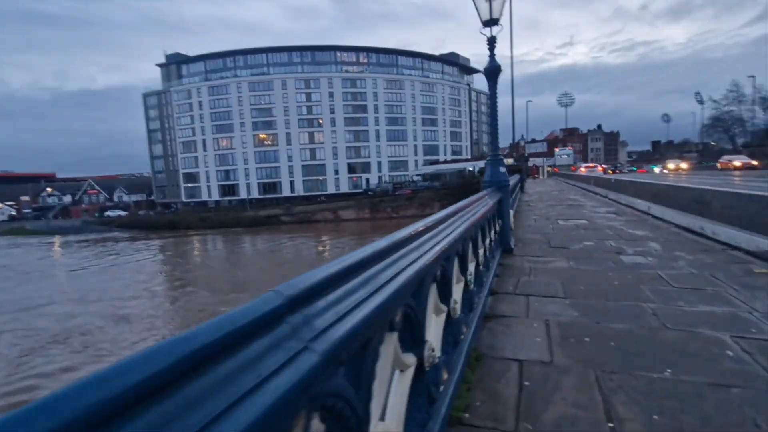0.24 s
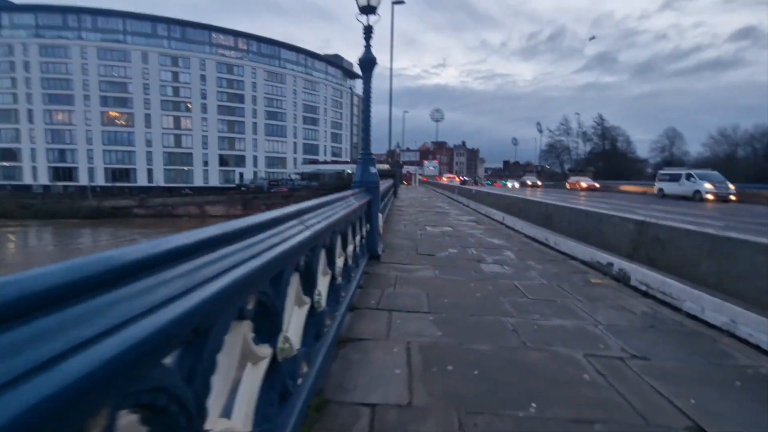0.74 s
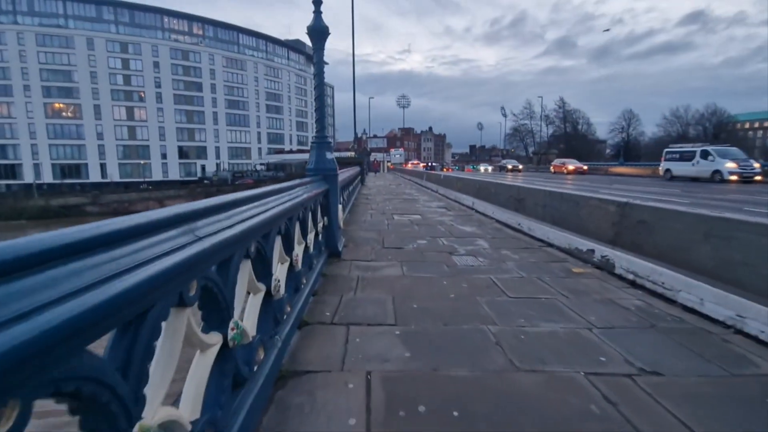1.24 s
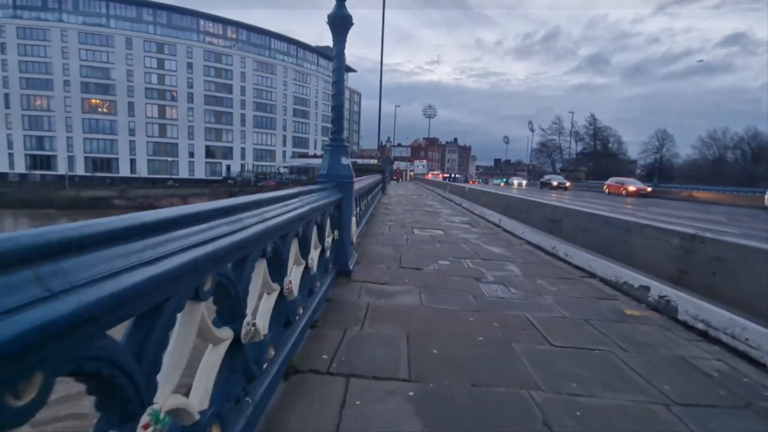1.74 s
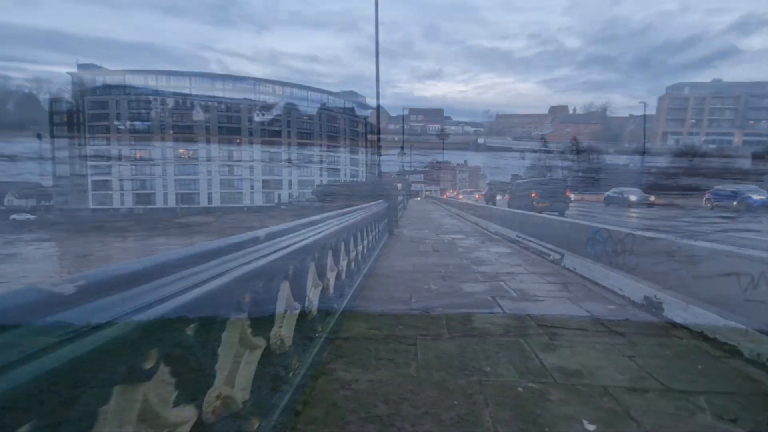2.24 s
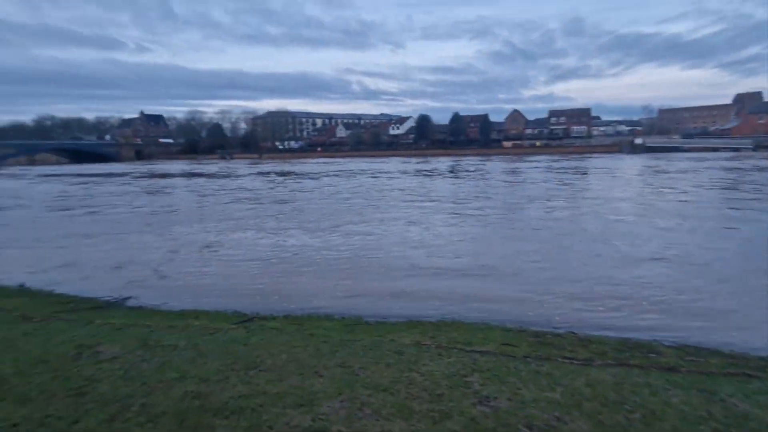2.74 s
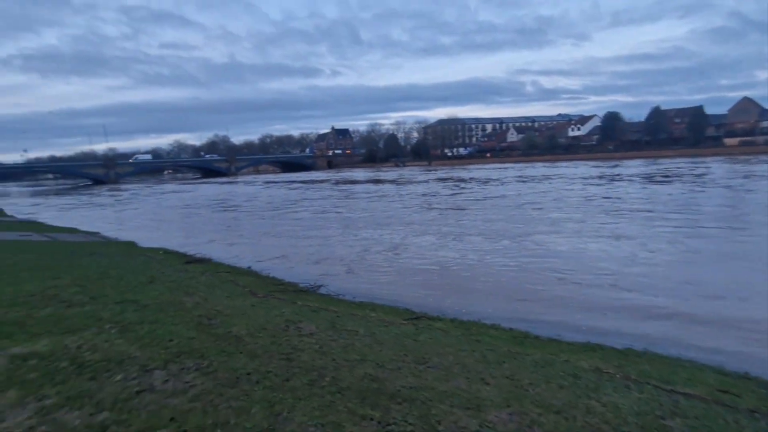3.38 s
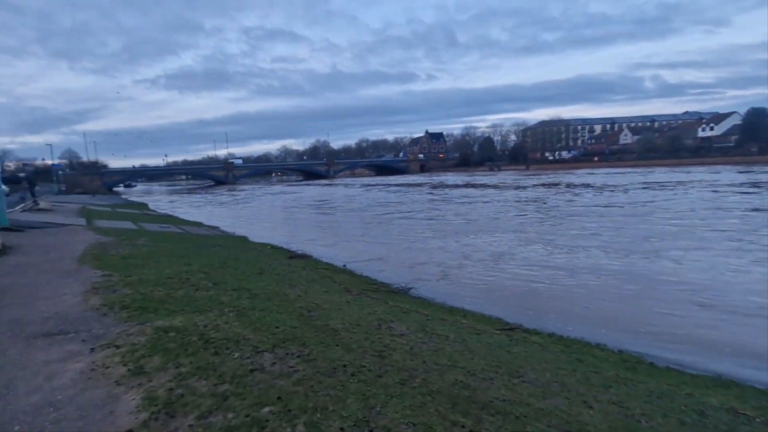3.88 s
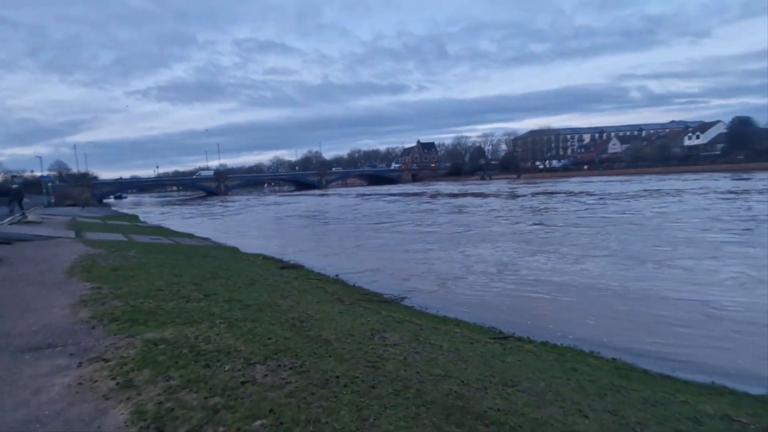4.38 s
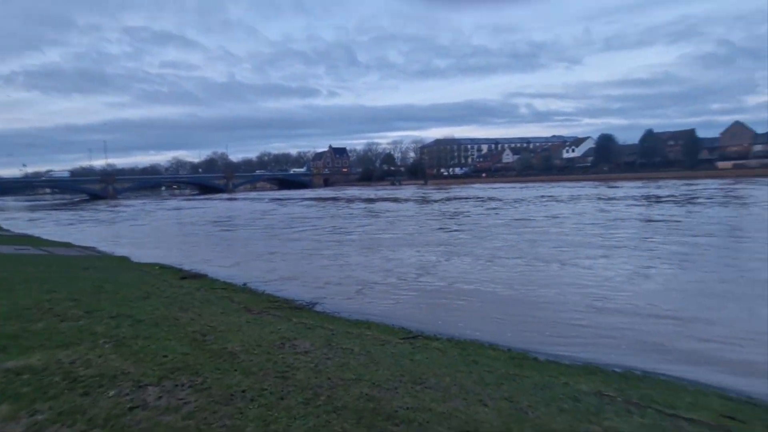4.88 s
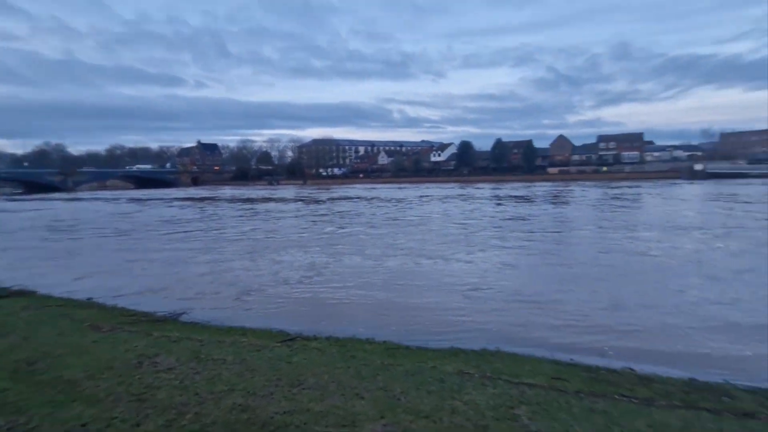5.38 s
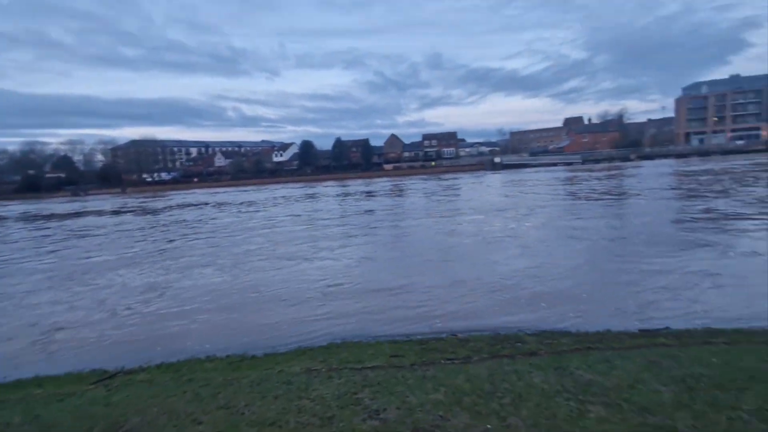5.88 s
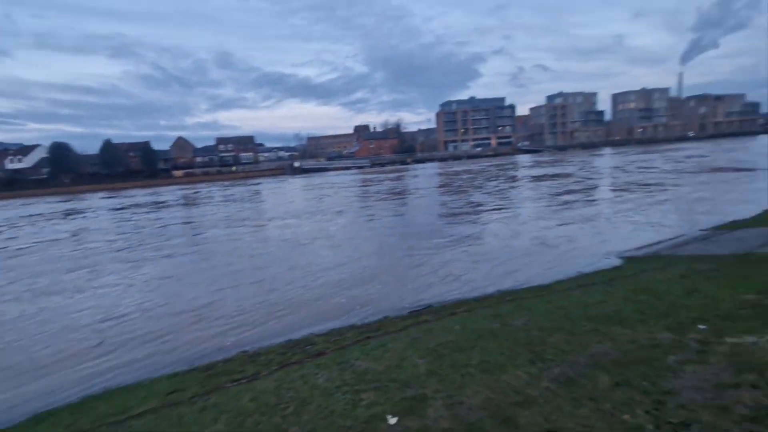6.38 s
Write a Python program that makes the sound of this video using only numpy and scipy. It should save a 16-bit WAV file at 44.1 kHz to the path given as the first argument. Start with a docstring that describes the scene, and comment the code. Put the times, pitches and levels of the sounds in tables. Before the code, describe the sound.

Loud tyre roar and throbbing engines stop dead; after a brief silence, soft river wash and distant rumble continue with gusts and faint bumps.

```python
"""Traffic on a wet bridge, heard from the footway: tyres roar, spray hisses and exhausts beat together.
Tyres, spray, rumble, river and wind are shaped stereo noise; the exhausts are sines at drifting firing rates.
After a brief silence comes a river bank: the town rumbles far off and the water washes by.
Close up, gusts mostly catch the right microphone port and a sleeve swishes in grainy strokes;
taps are sharp pushes on the camera, ticks ringing noise bursts and soft low thumps dying sines."""
import sys
import numpy as np
from scipy import signal
from scipy.fft import rfft, irfft, next_fast_len
from scipy.io import wavfile
from scipy.ndimage import uniform_filter1d, map_coordinates

SR = 44100
rng = np.random.default_rng(int(sys.argv[2]) if len(sys.argv) > 2 else 0)


def log_audio(samples):
    """Write samples as a 16-bit WAV file to the path given in sys.argv[1]."""
    # one column per channel
    frames = np.atleast_2d(samples).T
    # limit to full scale, then quantise
    limited = np.clip(frames, -1, 1)
    pcm = np.round(limited * 32767).astype(np.int16)
    wavfile.write(sys.argv[1], SR, pcm)


N = 291930

LEAVE_BRIDGE_S, REACH_BANK_S = 2.226, 2.349
TOP_HZ = 15850  # band limit of the camera

# lean_db is left level minus right level; relative_db sets only the shape of a spectrum.
# tyre roar of the near lanes, shifting left as a van goes by, before lift and tint:
# start_s, level_db, lean_db
TYRE_PASSES = [(0, -34, 0), (.45, -35, -0.5), (.8, -33.5, -0.5), (1.03, -32.5, 1.5), (1.22, -34, 1),
               (1.38, -33.5, 0.5), (1.72, -36, 4), (2.22, -34, 3)]
ROAR_LIFT_DB = 4.5
# colour of the treads: pitch_hz, relative_db
TYRE_SPECTRUM = [(180, -25), (300, -5), (377, -8.5), (620, -5), (885, -7), (1300, -5.5), (1730, -10),
                 (2230, -12), (2650, -20.5), (3140, -21), (5000, -30.5), (7300, -39.5), (9000, -69),
                 (15500, -73)]
# left-right likeness of the road noise: pitch_hz, coherence
ROAD_ALIKE = [(200, .97), (320, .9), (480, .76), (620, .7), (800, .54), (1200, .44), (1650, .48),
              (2100, .15), (3000, .05), (15000, 0)]
# the lanes lie to the right: the left port hears the roar this much later
ROAD_LAG_S = .00029
# the roar changes colour as the camera turns: time_s, share of the tint
BRIDGE_TURN = [(.6, -1), (1.4, 0.5)]
# the full tint of the roar: pitch_hz, gain_db
BRIDGE_TINT = [(250, 0.5), (380, -3), (540, 2.5), (750, -0.3), (1000, 0), (1500, 0.8), (2100, 1.5),
               (2800, -0.5), (4000, 1.5), (6000, -7), (8000, -3), (10000, 9), (12000, 2.5)]

# single cars throw up spray, before lift: centre_s, length_s, level_db, lean_db
SPRAY_BURSTS = [(.08, 0.14, -42.5, 5.5), (.2, 0.24, -51.5, 7.5), (.79, 0.053, -56, 9),
                (1.38, .2, -69.5, 11), (1.76, 0.68, -55.5, 1)]
# the steady spray of the whole road, before lift
MIST_DB, MIST_LEAN_DB = -64.5, 12.5
SPRAY_LIFT_DB = 3.5
# hiss of the spray: pitch_hz, relative_db
SPRAY_SPECTRUM = [(1500, -1), (3500, -2), (5500, -0.5), (7200, -3.5), (8800, -14.5), (10300, -13),
                  (11800, -6), (15500, -10.5)]

RUMBLE_DB = -30.5  # car bodies, around which the rumble wavers
# wheels thud over the uneven deck: centre_s, length_s, level_db, lean_db
DECK_THUDS = [(.79, 0.069, -34, 5.5), (1.025, 0.091, -23, -0.5), (1.22, 0.074, -27.5, 1),
              (1.385, 0.033, -30, 3), (1.415, 0.025, -26.5, 5), (1.72, 0.087, -36, 4),
              (2.07, 0.28, -29, 0.5)]
# rumble of the car bodies: pitch_hz, relative_db
RUMBLE_SPECTRUM = [(20, -25), (33, -1), (46, -2), (62, 0.5), (88, 7), (125, 4.5), (170, 1.5), (230, 1.5),
                   (300, -4), (400, -15.5), (700, -73)]

# firing rate of the nearest engine, before drift: time_s, pitch_hz
FIRING_RATE = [(0, 56), (.45, 55), (.7, 60), (1.15, 60), (1.65, 57), (2.22, 55)]
# a second engine fires this much slower: time_s, beat_hz
BEAT_RATE = [(.4, 6.7), (1.15, 7.0), (1.45, 6.2), (2.2, 5.9)]
IN_STEP_S = 1.382  # a moment at which these two boom together
# levels of two slower engines against the nearest; the third's speed over the nearest's
SECOND_DB, THIRD_DB, THIRD_RATIO = -8.5, -15, 0.79
# joint level of the exhausts, surging as they near: time_s, level_db
EXHAUST_SURGES = [(0, -32.5), (.42, -32.5), (.51, -26), (.66, -34), (.78, -24.5), (.9, -28), (1.22, -24.5),
                  (1.32, -27), (1.42, -23.5), (1.7, -22), (2.22, -22)]

# gusts on the ports: centre_s, length_s, level_db, lean_db
GUSTS = [(1.03, 0.12, -31, 4.5), (1.39, 0.033, -27, -7.5), (2.85, 0.014, -30.5, -15),
         (2.91, 0.1, -33.5, -13.5), (2.998, 0.028, -23, -23), (3.025, 0.047, -22.5, -30),
         (3.066, 0.03, -26, -14), (3.1, .05, -30.5, -13), (3.14, 0.052, -25.5, -12.5),
         (3.2, 0.035, -24.5, -20), (3.24, 0.042, -26.5, -20), (3.275, 0.048, -25.5, -12),
         (3.32, .04, -35, -14), (3.358, 0.037, -27.5, -22), (4.775, 0.014, -39, 2)]
# buffeting of a gust: pitch_hz, relative_db
BUFFET_SPECTRUM = [(20, -24), (50, -3), (95, 3), (150, 1), (220, -4), (310, -3.5), (430, -10.5), (750, -13),
                   (1400, -21.5), (2100, -25.5), (2700, -29), (4200, -39.5), (7000, -57.5), (9500, -64),
                   (15000, -68.5)]
# left-right likeness of the buffeting: pitch_hz, coherence
BUFFET_ALIKE = [(110, 0.89), (230, 0.23), (600, 0.12)]
# some gusts carry a rasp, as does a faint puff at 4.775 s: centre_s, length_s, level_db, lean_db
RASPS = [(2.992, .016, -37.5, -21), (3.015, 0.047, -34, -23), (3.063, 0.024, -35.5, -18),
         (3.145, 0.048, -38, -20), (3.205, 0.044, -33.5, -23.5), (3.268, 0.043, -32, -25),
         (3.361, 0.022, -35.5, -23), (4.775, 0.036, -40.5, 5)]
# colour of the rasp: pitch_hz, relative_db
RASP_SPECTRUM = [(400, -13), (1000, 3.5), (1500, 6), (2200, 0), (2800, -11.5), (3900, -16), (5000, -33),
                 (7000, -36), (10000, -44.5)]

# sleeve swishes, with one very short burst of hiss in the click at 1.42 s:
# centre_s, length_s, level_db, lean_db
SWISHES = [(1.29, .035, -38.5, -2.5), (1.36, 0.017, -39.5, -11), (1.424, 0.0045, -37.5, -12.5),
           (2.51, 0.09, -61.5, -6), (2.595, 0.032, -50.5, -14), (2.76, 0.3, -50.5, -20),
           (2.89, 0.041, -46.5, -20), (3.0, 0.17, -50.5, -16.5), (3.25, 0.29, -54.5, -24),
           (3.63, 0.15, -63, -15.5), (4.768, 0.071, -55.5, -10), (5.13, 0.053, -54.5, -16),
           (5.21, 0.056, -55, -12), (5.424, 0.036, -51.5, -14), (5.535, 0.031, -53.5, -6),
           (6.19, 0.16, -59, 14), (6.305, 0.13, -56, 14.5), (6.46, .04, -59, 24), (6.57, 0.12, -62, 29)]
# colour of the swishes: pitch_hz, relative_db
CLOTH_SPECTRUM = [(900, -13.5), (2000, 4.5), (3300, 2), (5500, -5), (7000, -12), (9000, -30.5),
                  (12000, -22.5), (15500, -20)]
# unevenness of the fabric: fine grain, slower catching
FIBRE_GRAIN_DB, FIBRE_CATCH_DB = 1.8, 1.2

# dry taps on the camera body, before colouring: start_s, level_db, lean_db, contact_s
TAPS = [(1.144, -18, -8, .0001), (1.255, -19.5, -5, 0.00023), (1.3492, -20.5, -10, 0.00021),
        (1.362, -19, -8.5, 0.0002), (1.4113, -18.5, -9, 0.00029), (1.4155, -12.5, -17, 0.00012),
        (1.421, -14, -17, .00017), (1.4233, -13.5, -14, .00014), (1.424, -11, -17.5, 0.00005),
        (1.4287, -17.5, -11, 0.00012), (2.941, -25.5, -14, .0005), (2.988, -18, -18.5, 0.00071),
        (3.351, -22.5, -18, .0006), (4.956, -28, -12, 0.00037), (5.742, -29, 5, 0.00036),
        (5.746, -38.5, 6, .00022)]
# colour of the taps: pitch_hz, gain_db
TAP_COLOUR = [(1500, -1), (4000, -4), (7000, -4), (9000, -20.5), (15500, -5.5)]
# against the tap: scratch after each contact, then the case's dull answer
GRIT_DB, GRIT_T60_S = -17, 0.009
KNOCK_HZ, KNOCK_T60_S, KNOCK_DB = 190, 0.017, -11.5

# thin high ticks: start_s, level_db, pitch_hz (centre), lean_db
TICKS = [(2.894, -46.5, 12540, 4), (4.252, -62, 6950, -6), (4.43, -66, 7400, -6), (4.76, -63, 8700, 6)]
TICK_HALF_WIDTH_HZ, TICK_T60_S = 830, 0.054  # shared by all ticks

# soft low thumps, those near 3 s being the body of the gust, before lift:
# start_s, level_db, pitch_hz, t60_s
THUMPS = [(2.988, -22, 215, .07), (3.019, -16.5, 114, 0.085), (3.022, -18.5, 238, .06),
          (3.939, -26.5, 147, 0.12), (4.108, -27.5, 60.2, 0.37), (4.949, -21.5, 60.7, 0.12),
          (5.601, -24, 54.6, 0.19), (5.738, -19.5, 154.5, 0.062), (5.741, -23, 255, 0.051),
          (5.818, -26.5, 64.6, 0.49)]
THUMP_LIFT_DB = 0.5

# wash of the river, before wavering, tint and fade: time_s, level_db
WASH_LEVEL = [(2.36, -38), (2.5, -39.5), (2.75, -40.5), (3.6, -41.5), (4.5, -42), (4.9, -41), (5.45, -42),
              (5.7, -43.5), (6.62, -44.5)]
# colour of the wash: pitch_hz, relative_db
RIVER_SPECTRUM = [(210, -16), (340, -3.5), (470, -3), (720, -0.8), (980, -.5), (1200, -1.5), (1450, -3),
                  (1800, -6), (2150, -8.5), (2650, -18.5), (3300, -22.5), (3900, -26.5), (5100, -34.5),
                  (7200, -42.5), (9300, -57.5), (15500, -62)]
# the wash changes colour as the camera turns: time_s, share of the tint
BANK_TURN = [(4.9, 0), (5.7, 0.96)]
# the full tint of the wash: pitch_hz, gain_db
BANK_TINT = [(200, 5), (330, 4.5), (480, 4.5), (720, -2), (1100, -1), (1800, 0), (3000, 0.5), (4500, 0.5),
             (6000, 1), (8000, -15), (15000, 2)]
# far rumble at the start of the bank, before its swell-in; its slow ebb
TOWN_DB, TOWN_FALL_DB_PER_S = -34.5, 0.41
# rumble of the town: pitch_hz, relative_db
TOWN_SPECTRUM = [(15, -36), (25, -18), (35, -4), (46, 2), (57, 5), (80, -1), (131, -3), (188, -7),
                 (275, -7.5), (345, -14.5), (450, -23), (700, -76)]
BANK_FADE_DB, BANK_FADE_S = 8.5, 0.085  # the bank swells in by this much, over this time
# left-right likeness of sound from all around: pitch_hz, coherence
ALIKE = [(60, 0.98), (130, 0.97), (290, 0.82), (450, 0.5), (620, 0.46), (900, -0.13), (1350, -0.36),
         (1800, 0.091), (3200, 0.053), (15000, -0.084)]


def amp(db):
    """Decibels to gain."""
    return 10 ** (np.asarray(db) / 20)


def unit(x):
    """Scale to rms 1."""
    return x / np.sqrt(np.mean(x ** 2) + 1e-20)


def clock():
    """The time of every sample, in seconds."""
    return np.arange(N) / SR


def along(points, hz):
    """Read (pitch_hz, value) points on a log frequency axis."""
    f, v = np.transpose(points)
    return np.interp(np.log(hz + 1), np.log(f + 1), v)


def curves(rows):
    """One value per sample for each column after the time."""
    s, *cols = np.transpose(rows)
    return [np.interp(clock(), s, c) for c in cols]


def wobble(rate):
    """A smooth random curve with rate knots a second."""
    knots = rng.standard_normal(int(N * rate / SR) + 4)
    return map_coordinates(knots, [np.arange(N) * rate / SR])


def filtered(x, response):
    """Shape x with a response given as a function of frequency."""
    m = next_fast_len(N + 8192)
    return irfft(rfft(x, m) * response(np.fft.rfftfreq(m, 1 / SR)), m)[..., :N]


def pan(lean_db):
    """Left and right gains of constant power."""
    gains = amp(np.array([[.5], [-.5]]) * lean_db)
    return gains / np.sqrt(np.mean(gains ** 2, axis=0))


def rush(spectrum, alike, patchy_db=0):
    """Stereo noise of rms 1, smooth or with patches of random gain, its width set by the coherence."""
    z = signal.stft(rng.standard_normal((2, N)), nperseg=512)[2]
    field = rng.standard_normal(z.shape[1:])
    field = uniform_filter1d(field, size=5, axis=0)  # across frequency
    field = uniform_filter1d(field, size=14, axis=1)  # across time
    pair = signal.istft(z * amp(patchy_db * unit(field)), nperseg=512)[1][:, :N]

    def mid_side(hz):
        angle = np.arccos(np.clip(along(alike, hz), -1, 1)) / 2
        return amp(along(spectrum, hz)) * [np.cos(angle), np.sin(angle)]

    mid, side = filtered(pair, mid_side)
    return unit(np.array([mid + side, mid - side]))


def swells(rows):
    """Stereo envelope of bell-shaped swells whose powers sum."""
    t = clock()
    power = 0
    for s, length, db, lean_db in rows:
        bell = np.exp(-np.minimum((2 * (t - s) / length) ** 2, 100))
        power = power + (amp(db) * pan(lean_db)) ** 2 * bell
    return np.sqrt(power)


def turned(x, turn, tint):
    """x takes on a tint as the camera turns."""
    share, = curves(turn)
    tinted = filtered(x, lambda hz: amp(along(tint, hz)))
    return x + share * (tinted - x)


def from_right(x, lag_s):
    """The sound reaches the left port later than the right."""
    return filtered(x, lambda hz: np.exp(np.array([[-1j], [1j]]) * np.pi * hz * lag_s))


def tyre_roar():
    """Treads roar from the lanes on the right: patchy noise, levelled and panned by the passing cars."""
    level_db, lean_db = curves(TYRE_PASSES)
    treads = rush(TYRE_SPECTRUM, ROAD_ALIKE, patchy_db=1.5)
    treads = turned(treads, BRIDGE_TURN, BRIDGE_TINT)
    return from_right(amp(level_db + ROAR_LIFT_DB) * treads * pan(lean_db), ROAD_LAG_S)


def spray():
    """Wet treads throw up fine water: a steady hiss with bursts from single cars."""
    mist = amp(MIST_DB) * pan(MIST_LEAN_DB)
    wetness = np.hypot(mist, swells(SPRAY_BURSTS))
    return amp(SPRAY_LIFT_DB) * wetness * rush(SPRAY_SPECTRUM, ALIKE)


def car_bodies():
    """Car bodies rumble in low noise that swells as wheels thud over the deck."""
    steady = amp(RUMBLE_DB + 0.23 * wobble(7.9))
    return np.hypot(steady, swells(DECK_THUDS)) * rush(RUMBLE_SPECTRUM, ROAD_ALIKE, patchy_db=1.0)


def engines():
    """Firing pulses boom in a nearing exhaust; two slower engines beat against it."""
    firing_hz, = curves(FIRING_RATE)
    beat_hz, = curves(BEAT_RATE)
    level_db, = curves(EXHAUST_SURGES)
    drift = 1 + .012 * wobble(14)
    phase = 2 * np.pi * np.cumsum(firing_hz * drift) / SR
    lag = 2 * np.pi * np.cumsum(beat_hz) / SR
    lag_in_step = np.interp(IN_STEP_S, clock(), lag)
    near = np.sin(phase) + amp(-24.0) * np.sin(2 * phase) + amp(-28.5) * np.sin(4 * phase)
    second = amp(SECOND_DB) * np.sin(phase - lag + lag_in_step)
    third = amp(THIRD_DB) * np.sin(THIRD_RATIO * phase + 0.835 * wobble(4.5))
    return amp(level_db) * unit(near + second + third) * pan(1.0)


def wind():
    """Eddies break on the ports in quick irregular lumps; some gusts and a faint puff carry a rasp."""
    eddies = rush(BUFFET_SPECTRUM, BUFFET_ALIKE, patchy_db=1.5)
    lumps = amp(2.2 * wobble(160))
    tearing = amp(3 * wobble(400))
    buffeting = swells(GUSTS) * unit(eddies * lumps)
    rasping = swells(RASPS) * unit(rush(RASP_SPECTRUM, ALIKE) * tearing)
    return buffeting + rasping


def sleeve():
    """Fabric slides in short grainy strokes, catching as it goes; one very short hiss joins a click."""
    fibres = rush(CLOTH_SPECTRUM, ALIKE)
    unevenness = amp(FIBRE_GRAIN_DB * wobble(300) + FIBRE_CATCH_DB * wobble(60))
    return swells(SWISHES) * unit(fibres * unevenness)


def taps():
    """Each tap is one sharp push with a little grit, duller for a longer contact, and a knock of the case."""
    out, t = np.zeros((2, N + SR)), np.arange(SR // 10) / SR
    knock = amp(KNOCK_DB - 60 * t / KNOCK_T60_S) * np.sin(2 * np.pi * KNOCK_HZ * t)
    for s, db, lean_db, contact_s in TAPS:
        u = np.pi * t / contact_s
        grit = amp(GRIT_DB - 60 * t / GRIT_T60_S) * rng.standard_normal(len(t))
        force = (t == 0) + grit  # one impulse, then the scratch
        push = signal.fftconvolve(force, u * np.exp(1 - u))[:len(t)]
        out[:, round(s * SR):][:, :len(t)] -= amp(db) * (push + knock) * pan(lean_db)
    return filtered(out[:, :N], lambda hz: amp(along(TAP_COLOUR, hz)))


def ticks():
    """Each tick is a fast-dying noise burst in one high resonance."""
    out, t = np.zeros((2, N + SR)), np.arange(SR // 4) / SR
    hz = np.fft.rfftfreq(len(t), 1 / SR)
    for s, db, centre_hz, lean_db in TICKS:
        colour = 1 / (1 + ((hz - centre_hz) / TICK_HALF_WIDTH_HZ) ** 2)
        noise = rng.standard_normal((2, len(t)))
        burst = unit(irfft(rfft(noise) * colour, len(t)))
        envelope = amp(db - 60 * t / TICK_T60_S) * (1 - np.exp(-t / .0005))
        out[:, round(s * SR):][:, :len(t)] += envelope * burst * pan(lean_db)
    return out[:, :N]


def low_thumps():
    """Each soft low thump is a sine with a soft onset and an exponential decay."""
    out = np.zeros(N)
    for s, db, hz, t60 in THUMPS:
        t = np.maximum(clock() - s, 0)
        envelope = amp(db + THUMP_LIFT_DB - 60 * t / t60) * (1 - np.exp(-t / 0.006))
        out += envelope * np.sin(2 * np.pi * hz * t)
    return out


def river_bank():
    """Far traffic is a low rumble under the even wash of the river; both swell in together."""
    since = clock() - REACH_BANK_S
    wash_db, = curves(WASH_LEVEL)
    fade = amp(-BANK_FADE_DB * np.clip(1 - since / BANK_FADE_S, 0, 1))
    town_level = amp(TOWN_DB - TOWN_FALL_DB_PER_S * since + 0.22 * wobble(5.9))
    town = town_level * rush(TOWN_SPECTRUM, ALIKE)
    water = turned(rush(RIVER_SPECTRUM, ALIKE, patchy_db=1.1), BANK_TURN, BANK_TINT)
    wash = amp(wash_db + .3 * wobble(4.85)) * water
    return fade * (town * pan(0.55) + wash * pan(2.9))


def scene():
    """The bridge, a moment of silence, then the bank, with the close sounds in both."""
    on_bridge = clock() < LEAVE_BRIDGE_S  # the bridge scene ends abruptly, mid-swing, with a small click
    on_bank = np.clip((clock() - REACH_BANK_S) / .003, 0, 1)
    bridge = tyre_roar() + spray() + car_bodies() + engines()
    close = wind() + sleeve() + taps() + ticks() + low_thumps()
    return on_bridge * (bridge + close) + on_bank * (river_bank() + close)


def record(dry):
    """The camera keeps nothing above its band limit."""
    return filtered(dry, lambda hz: hz < TOP_HZ)


dry = scene()
out = record(dry)
log_audio(out)
```